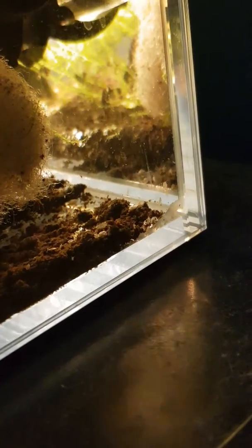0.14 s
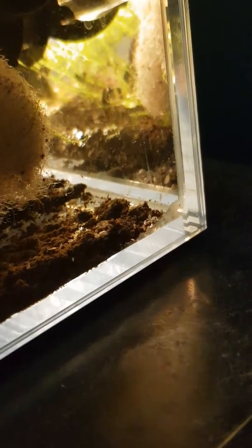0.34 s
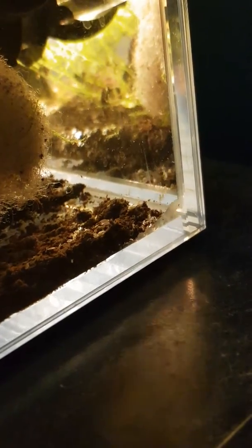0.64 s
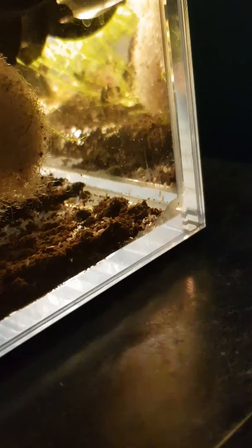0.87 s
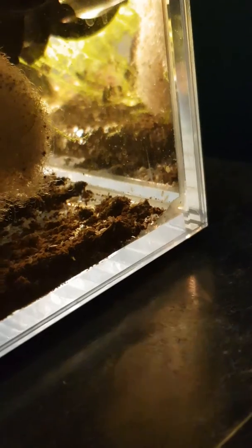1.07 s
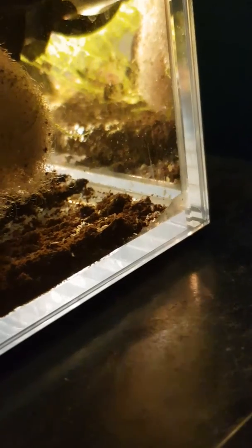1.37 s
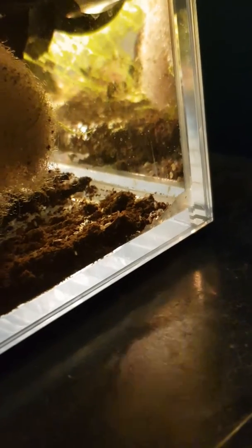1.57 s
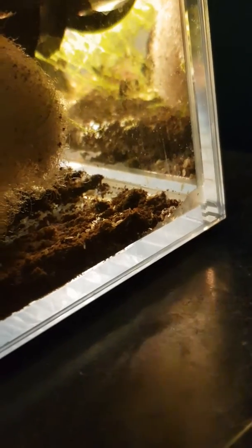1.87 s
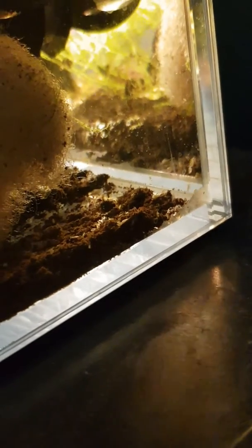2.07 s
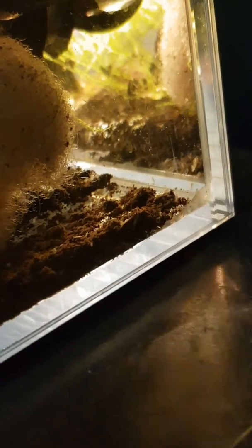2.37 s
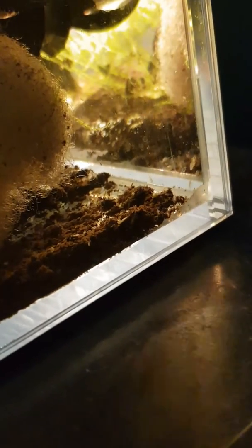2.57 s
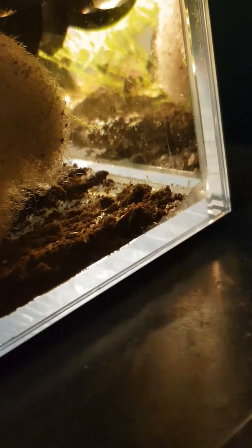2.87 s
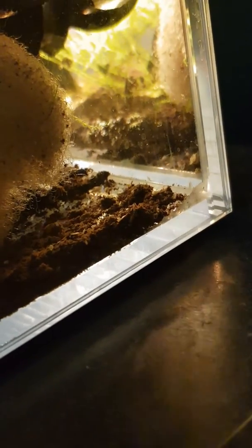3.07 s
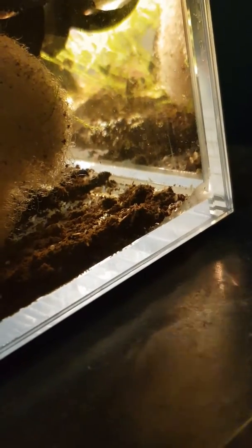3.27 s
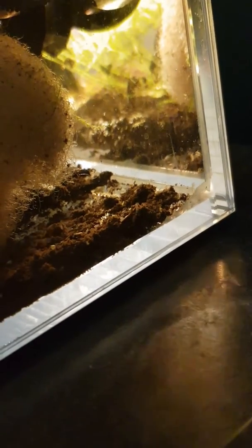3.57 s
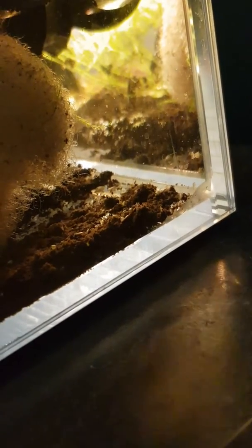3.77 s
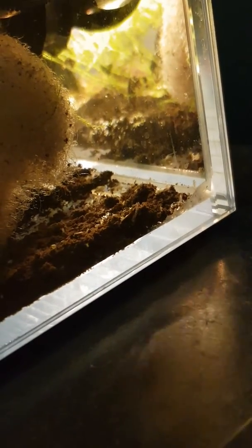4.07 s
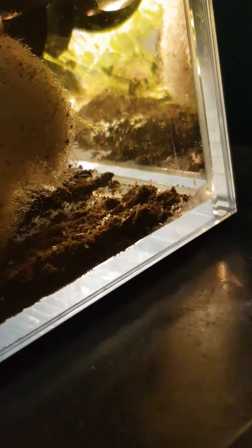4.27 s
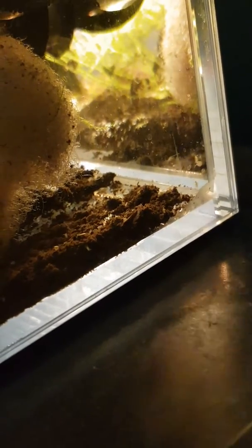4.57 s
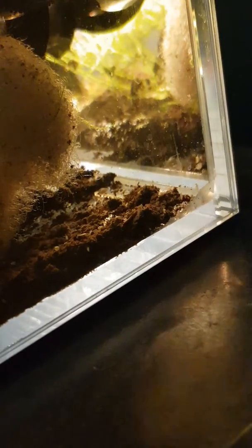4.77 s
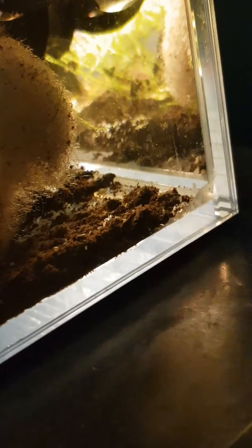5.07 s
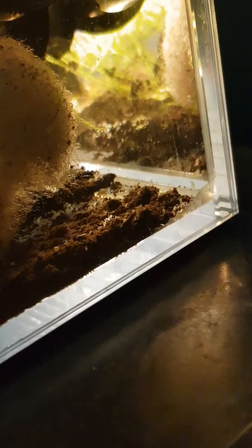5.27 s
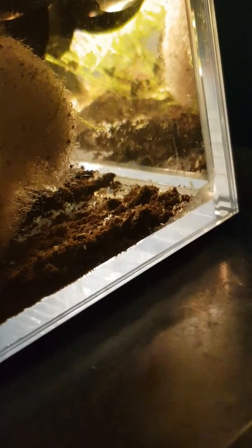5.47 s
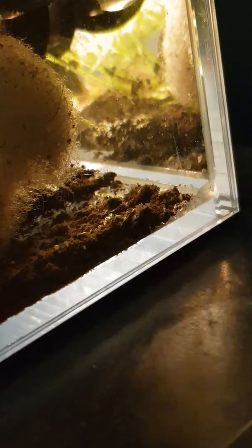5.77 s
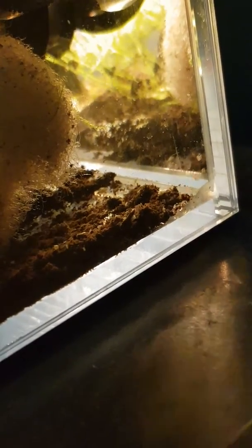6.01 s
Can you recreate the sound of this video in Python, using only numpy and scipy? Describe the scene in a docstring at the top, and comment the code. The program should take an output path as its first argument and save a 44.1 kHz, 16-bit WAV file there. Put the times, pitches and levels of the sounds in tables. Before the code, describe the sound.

A small air pump hums steadily close by while bubbles gurgle and plop in a little glass tank, with tiny crisp fizzes at the surface.

```python
"""An air pump hums close to the microphone: a stack of mains overtones in step, wavering slightly.
Beside it, in a small glass tank, a sponge filter trickles bubbles: damped, climbing sines ring the
fixed resonances of tank and water. Tiny bubbles burst at the surface as short, sharp fizzes.
Further off a second motor drones as one low tone; shaped noise is the air of the room.
Two microphone ports, left and right, take each source at their own levels."""
import sys
import numpy as np
from scipy import signal
from scipy.fft import rfft, irfft, next_fast_len
from scipy.io import wavfile
from scipy.ndimage import uniform_filter1d, map_coordinates

SR = 44100
rng = np.random.default_rng(int(sys.argv[2]) if len(sys.argv) > 2 else 0)


def generate_wav(signal):
    """Clip the signal to [-1, 1] and save it as 16-bit WAV at the path in sys.argv[1]."""
    frames = np.transpose(np.atleast_2d(signal))
    scaled = np.clip(frames, -1, 1) * 32767
    pcm = np.round(scaled).astype(np.int16)
    wavfile.write(sys.argv[1], SR, pcm)


def gain_from_db(level_db):
    """Turn a decibel level (scalar or array-like) into a linear amplitude factor."""
    decades = np.asarray(level_db, float) / 20
    return 10 ** decades


N = 270774  # samples

# mains frequency that drives the pump: t/s, f/Hz
MAINS_DRIFT = [(0, 50.074), (2.5, 50.073), (6.14, 50.057)]
# pump overtones: multiple of the mains, left rms level/dB, right rms level/dB (both before the waver),
# left lead/rad
PUMP_OVERTONES = [(1, -51.5, -55.5, 0.3), (2, -36.5, -35.5, 0.2), (3, -56.5, -57.5, 1.8),
                  (4, -46.5, -48, 0.16), (5, -43.5, -48, 0.99), (6, -53.5, -74, 1.5), (7, -44, -49, 0.5),
                  (8, -58.5, -64, -2), (9, -65.5, -69, 2), (10, -58.5, -62, 1.08), (11, -87, -60, 1.74),
                  (12, -69, -60.5, -1.64), (13, -60.5, -59, 1.9), (14, -59.5, -63, -1),
                  (16, -68.5, -76, -2), (17, -71, -62, -2.5), (18, -66, -61.5, -2.5)]
# resonances of tank, water and shelf: f/Hz, width/Hz, left gain/dB, right gain/dB, left lead/rad
TANK_MODES = [(228.4, 29.6, 4.5, 0, 0.4), (448, 17.5, 1.8, -1.5, 1.1), (596, 36, -9.5, -13.5, 2.5),
              (810, 9.8, -12.5, -17, -0.3), (845, 22, -14.5, -3.5, 3), (913.6, 21, -1, -9.5, -2.5),
              (999, 16, -4, -4, 3.5), (1062, 24, -14, -11, -2), (1210, 11, -9.5, -16.5, -3),
              (1300, 13, -12.5, -10, -1.05), (1447, 28, -10.5, -12, 2), (1588, 9, -6.5, -33, 7),
              (1619, 17.5, -6, -17.5, 3), (1702, 27, -2.5, -14, -3), (1870, 21, -6, -20, -2.5),
              (1940, 18, -7, -21.5, -3.5), (1986, 21, -7, -18.2, -3.5), (2114, 51, -17, -22, -1.5),
              (2195, 9.9, -11, -14.5, 0.3), (2350, 18, -12.5, -19, 0.7), (2403, 16, -11, -17, 1.24),
              (2516, 39, -19, -15, -0.5), (2650, 40, -17, -17, 1.9), (2973, 30, -14, -22.5, 3.5),
              (3100, 38, -19, -17, 3.5), (3330, 130, -24, -27, -2), (3676, 78, -15.5, -35, 3.5),
              (4440, 99, -20.5, -36, 3.5)]
# bubbles pinching off: t/s, peak level of the two-port mean/dB (before the echo), starting pitch f/Hz
LARGE_BUBBLES = [(0.0035, -41, 1710), (0.047, -41, 1565), (0.5745, -43.5, 1690), (0.808, -34, 1630),
                 (0.8208, -47.5, 1020), (1.3605, -51, 2210), (1.469, -42.5, 1558), (1.7483, -40, 2420),
                 (1.9802, -40, 2350), (2.0182, -40.5, 1573), (2.3858, -50, 2370), (2.4425, -35, 1694),
                 (2.4929, -38, 2194), (2.4995, -47.5, 1460), (3.272, -44, 1994), (3.274, -48, 2350),
                 (3.5547, -45, 3000), (3.558, -47.5, 2650), (3.9592, -36, 1704), (4.205, -50, 1440),
                 (4.4423, -48, 1870), (4.846, -44.5, 1520), (5.1577, -43.5, 1900), (5.165, -52, 2370),
                 (5.4393, -37.5, 1806), (5.441, -48.5, 2360), (5.758, -39, 2190), (6.004, -44, 2250),
                 (6.0521, -42.5, 1573), (6.0765, -50, 1870)]
# the loudest bursts at the surface: t/s, nominal level/dB (before a common trim), pitch f/Hz
LOUD_BURSTS = [(0.061, -52, 9400), (0.356, -53, 14500), (0.437, -54, 7700), (0.518, -42, 14800),
               (0.527, -46, 5060), (0.675, -45, 14500), (0.964, -47, 3640), (1.51, -38, 15200),
               (1.577, -40, 14600), (1.689, -43, 4100), (1.779, -55.5, 8400), (2.014, -43, 15200),
               (2.101, -44, 14800), (2.12, -47, 11100), (2.365, -52, 14000), (2.66, -50, 14800),
               (2.797, -51, 9800), (2.949, -45, 15200), (3.002, -51, 6300), (3.316, -52, 15300),
               (3.35, -51, 15300), (3.429, -43, 9300), (3.66, -50, 9000), (3.701, -35, 14300),
               (4.08, -44, 13100), (4.304, -50, 12900), (4.341, -46, 15300), (4.578, -49, 13500),
               (4.856, -53.5, 8600), (4.93, -42, 13900), (4.971, -49, 15300), (5.422, -42.5, 13300),
               (5.656, -46, 13900), (5.666, -41, 6140), (5.798, -47.5, 3700), (5.942, -39.5, 13500)]
# distant motor: f/Hz, left rms level/dB, right rms level/dB (both before the waver), left lead/rad
FAR_MOTOR = (63.5, -42.5, -42, 0.06)
# room noise at the ports: f/Hz, left level/dB in 1 Hz, right level/dB in 1 Hz (before the faint patches)
ROOM_AIR = [(30, -85, -90), (93, -73.5, -73), (138, -78.5, -82), (282, -88, -83.5), (420, -80.5, -82.5),
            (520, -83.5, -84), (730, -82.5, -97), (1150, -89.5, -97.5), (2250, -95.5, -97),
            (3600, -93, -95.5), (5270, -95.5, -100), (7180, -100, -105), (8300, -110, -110),
            (9800, -102.5, -112), (12100, -104, -106), (13500, -102, -108), (15800, -100, -107)]
# likeness of the room noise at the two ports: f/Hz, likeness (0 to 1)
PORT_LIKENESS = [(60, 1), (300, 0.9), (600, 0.57), (2000, 0.028)]

ONSET_CYCLES = 1.6  # time constant of the start of every bubble and burst, in cycles
BUBBLE_CYCLES, BUBBLE_RISE = 58, 0.04  # cycles to fall 60 dB; share the pitch climbs meanwhile
CAVITY_CYCLES, FILM_CYCLES = 54, 5.2  # cycles to fall 60 dB: open cavity, tearing film
FILM_DB, FILM_DB_PER_OCTAVE = 4, 10  # film over cavity at 12 kHz, and its gain with rising pitch
SMALL_DB, SMALL_SPREAD_DB = 37, 14  # weakest random burst over the 1 Hz air level, and range above it


def along(points, hz):
    """Every column of (Hz, value, ..) points, read at hz on a log axis."""
    f, *cols = np.transpose(points)
    return np.array([np.interp(np.log(hz + 1), np.log(f + 1), c) for c in cols])


def wobble(rate):
    """A smooth random curve with rate knots a second."""
    knots = rng.standard_normal(int(N * rate / SR) + 4)
    return map_coordinates(knots, [np.arange(N) * rate / SR])


def filtered(x, response):
    """x times a complex response of frequency."""
    n = x.shape[-1]
    m = next_fast_len(n + 8192)
    spectrum = rfft(x, m) * response(np.fft.rfftfreq(m, 1 / SR))
    return irfft(spectrum, m)[..., :n]


def add(track, s, sound):
    """Mixes a sound into a track at s seconds."""
    i = round(s * SR)
    track[..., i:i + sound.shape[-1]] += sound


def tone(phase, left_db, right_db, lead):
    """A steady sine at both ports, rms dB; the right port lags by lead radians."""
    level = np.sqrt(2) * gain_from_db([[left_db], [right_db]])
    return level * np.cos(phase - np.array([[0], [lead]]))


def mains_swing():
    """Phase of the drifting mains in radians, which times the pump's strokes."""
    s, hz = np.transpose(MAINS_DRIFT)
    drift = np.interp(np.arange(N) / SR, s, hz)
    return 2 * np.pi * np.cumsum(drift) / SR + 1.3


def pump(swing):
    """The armature strikes once a mains cycle, so its overtones line up; higher ones waver more."""
    hum = np.zeros((2, N))
    for k, left_db, right_db, lead in PUMP_OVERTONES:
        waver = gain_from_db(0.056 * k * wobble(6))
        hum += tone(k * swing + 2.19, left_db, right_db, lead) * waver
    return hum


def tank(hz):
    """Response at each port of the tank's damped modes, alternating in sign."""
    modes = np.zeros((2, len(hz)), complex)
    for k, (centre, width, left_db, right_db, lead) in enumerate(TANK_MODES):
        ports = gain_from_db([[left_db], [right_db]]) * np.exp([[0], [-1j * lead]])
        damping = 1j * hz * width
        modes += (-1) ** k * ports * damping / (centre * centre - hz * hz + damping)
    return modes


def bubble(hz, life, rise, count):
    """A sine falling 60 dB in life seconds while its pitch climbs by the share rise."""
    t = np.arange(count) / SR
    ring = np.sin(2 * np.pi * hz * t * (1 + rise * t / life / 2))
    onset = 1 - np.exp(-t * hz / ONSET_CYCLES)
    return ring * gain_from_db(-60 * t / life) * onset


def large_bubbles():
    """Each bubble pinching off shakes the tank and is also heard straight through the air."""
    out = np.zeros((2, N + SR))
    for s, db, hz in LARGE_BUBBLES:
        pulse = bubble(hz, BUBBLE_CYCLES / hz, BUBBLE_RISE, count=9000)
        ring = filtered(pulse, tank) + gain_from_db([[-19], [-29]]) * pulse
        add(out, s, ring * gain_from_db(db) / np.abs(ring.mean(0)).max())
    return out[:, :N]


def trickle(swing, count=1500):
    """Small bubbles and the churn of rising air, swelling with the pump strokes, shake the tank."""
    stream = np.zeros(N + SR)
    for when, pitch, size in rng.random((count, 3)):
        hz = 1100 * 4.2 ** pitch
        level = gain_from_db(-35 + 11.1 * size) * np.sqrt(hz / 1500)
        add(stream, when * N / SR, bubble(hz, 25 / hz, 0.082, count=2000) * level)
    stroke = gain_from_db(1.5 * np.sin(swing))  # air arrives once a pump stroke
    churn = gain_from_db(-29.5 + 2.1 * wobble(8)) * rng.standard_normal(N)
    return filtered(stroke * (stream[:N] + churn), tank)


def bubbles(swing):
    """All bubbles, answered by the room: a noise tail that falls 60 dB in 0.2 s."""
    near = large_bubbles() + trickle(swing)
    decay = gain_from_db(-60 * np.arange(SR // 3) / SR / 0.2)
    tail = rng.standard_normal((2, SR // 3)) * decay
    tail /= np.linalg.norm(tail[0])
    echo = signal.fftconvolve(near[:1], tail, axes=1)[:, :N]
    return near + gain_from_db([[-12], [-14]]) * echo


def burst(hz):
    """The snap of the tearing film and a ring of the open cavity; higher bursts snap more."""
    ring = bubble(hz, CAVITY_CYCLES / hz, 0, count=800)
    snap = bubble(hz, FILM_CYCLES / hz, 0, count=800)
    film = gain_from_db(FILM_DB + FILM_DB_PER_OCTAVE * np.log2(hz / 12000))
    blip = ring / np.linalg.norm(ring) + film * snap / np.linalg.norm(snap)
    return blip / np.linalg.norm(blip)


def wall_smear():
    """Noise from the walls in a fast and a slow decay; it builds up later at the right port."""
    t = np.arange(SR // 5) / SR
    decay = gain_from_db(-60 * t / 0.072) + 0.19 * gain_from_db(-60 * t / 0.24)
    build = 1 - np.exp(-t / [[.0015], [.004]])
    return rng.standard_normal((2, len(t))) * decay * gain_from_db([[0], [-3]]) * build


def bursts(count=300):
    """Loud and random small bursts at the surface, smeared by the walls."""
    events = list(LOUD_BURSTS)
    for when, size, pitch in rng.random((count, 3)):
        hz = 7000 + 9000 * pitch
        db = along(ROOM_AIR, hz)[0] + SMALL_DB + SMALL_SPREAD_DB * size * size
        events.append((when * N / SR, db, hz))
    out = np.zeros((2, N + SR))
    for s, db, hz in events:
        fizz = signal.fftconvolve(wall_smear(), burst(hz)[None], axes=1)
        add(out, s, fizz * gain_from_db(db - 2.5 - along(ROOM_AIR, hz)[0]))  # makes up for the colour below

    def treble_colour(hz):
        return gain_from_db(along(ROOM_AIR, np.maximum(hz, 3000)))

    return filtered(out[:, :N], treble_colour)


def drone():
    """A second motor further off: one low tone, wavering in phase and level."""
    hz, left_db, right_db, lead = FAR_MOTOR
    phase = 2 * np.pi * hz * np.arange(N) / SR + 0.12 * wobble(2)
    return tone(phase, left_db, right_db, lead) * gain_from_db(0.61 * wobble(3.04))


def room():
    """Steady air noise with faint patches in time and pitch, alike at both ports only in the bass."""
    z = signal.stft(rng.standard_normal((2, N)), nperseg=512)[2]
    field = uniform_filter1d(rng.standard_normal(z.shape[1:]), 8, 0)
    field = uniform_filter1d(field, 8, 1)
    patches = gain_from_db(1.67 * field / field.std())
    pair = signal.istft(z * patches, nperseg=512)[1][:, :N]

    def mid_side(hz):
        turn = np.arccos(np.clip(along(PORT_LIKENESS, hz)[0], 0, 1)) / 2
        return np.array([np.cos(turn), np.sin(turn)])

    def colour(hz):
        return np.sqrt(SR / 2) * gain_from_db(along(ROOM_AIR, hz))

    mid, side = filtered(pair, mid_side)
    return filtered(np.array([mid + side, mid - side]), colour)


def scene():
    """Pump, bubbles, surface bursts, distant motor and room air together."""
    swing = mains_swing()
    return pump(swing) + bubbles(swing) + bursts() + drone() + room()


def low_pass(x):
    """Removes everything above the highest recorded frequency."""
    return signal.sosfilt(signal.butter(12, 16830, fs=SR, output="sos"), x)


def record(dry):
    """The recorder keeps nothing above its band limit of 15880 Hz."""
    mix = filtered(dry, lambda hz: hz < 15880)
    return low_pass(mix)


dry = scene()
out = record(dry)
generate_wav(out)
```